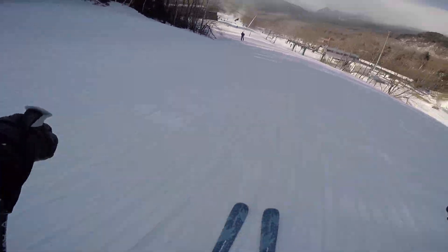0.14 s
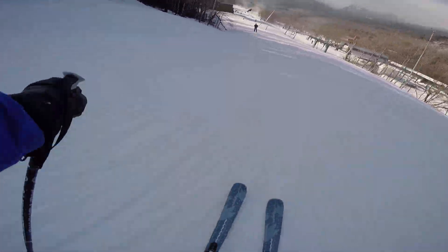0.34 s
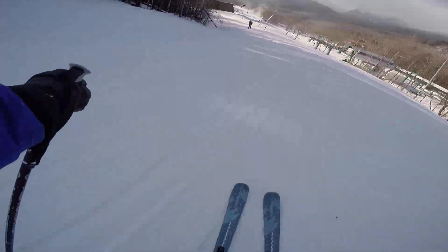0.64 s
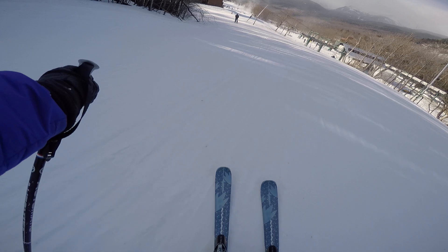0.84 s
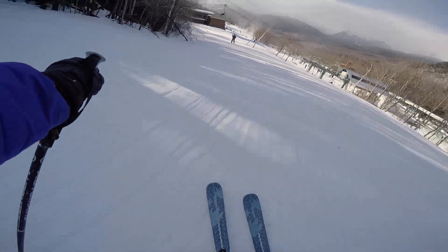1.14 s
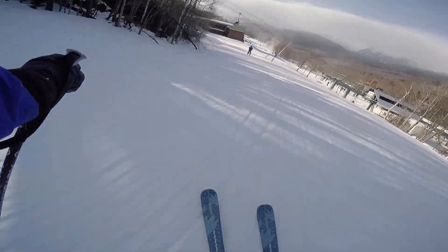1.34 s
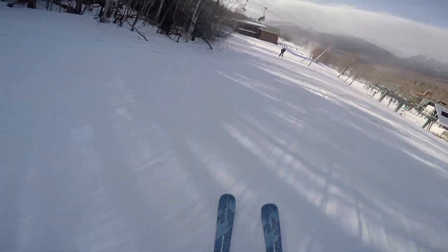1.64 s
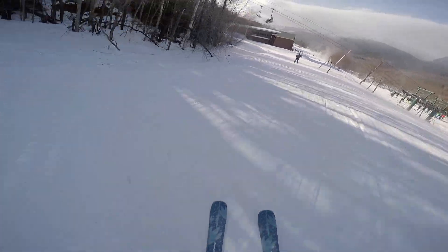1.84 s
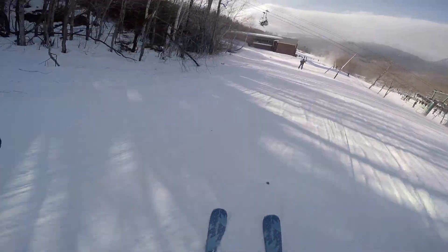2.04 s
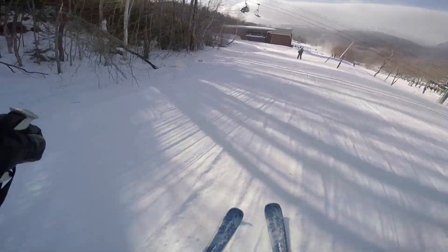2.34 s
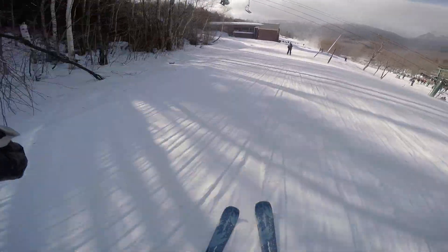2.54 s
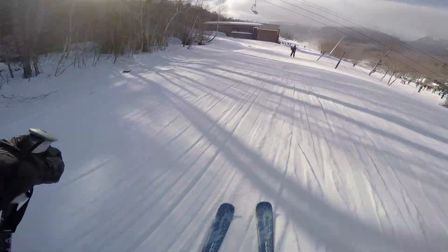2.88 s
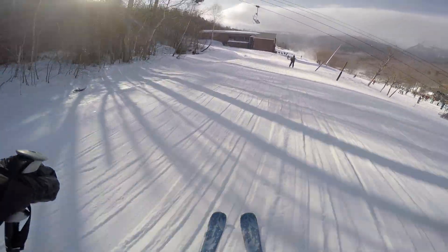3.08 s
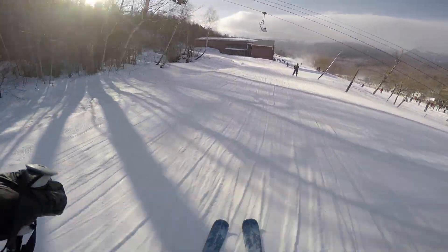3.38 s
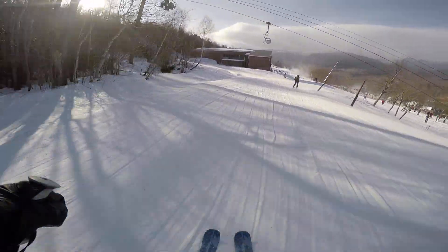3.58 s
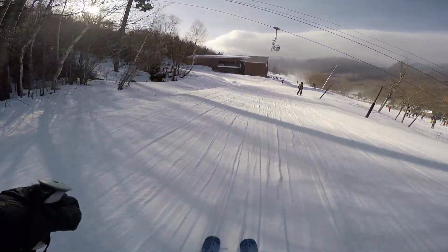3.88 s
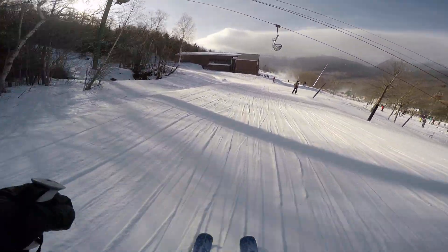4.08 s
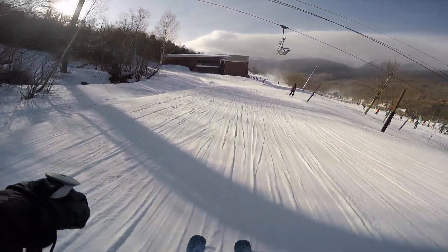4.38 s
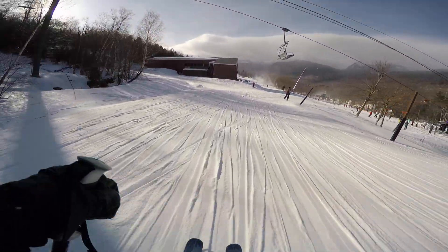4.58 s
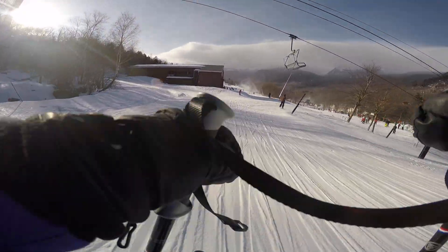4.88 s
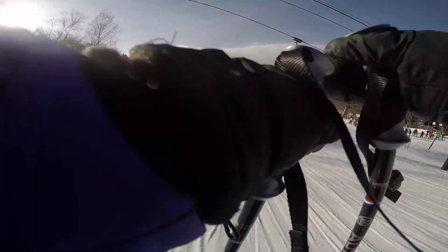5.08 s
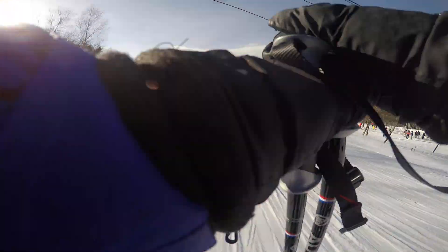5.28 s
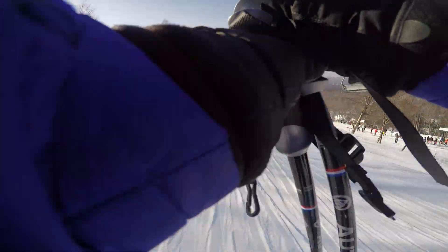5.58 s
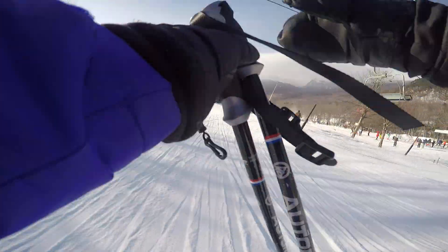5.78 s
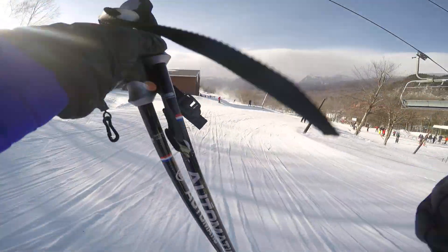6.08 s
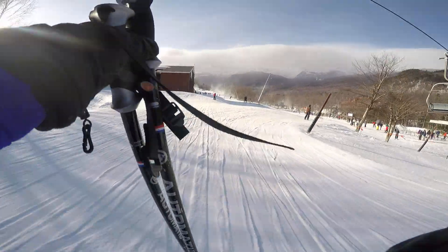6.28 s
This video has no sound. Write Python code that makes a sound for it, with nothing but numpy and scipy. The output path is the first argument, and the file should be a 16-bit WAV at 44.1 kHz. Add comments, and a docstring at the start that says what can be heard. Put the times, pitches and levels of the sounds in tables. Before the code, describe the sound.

Skis hiss and chatter over packed snow through a long turn, heard from a body-worn microphone whose plastic case rattles with the vibration. Wind rumbles and throbs on the microphone throughout. A buckle snaps right at the start, and small knocks and thumps follow the bumps. About halfway the skis run straight and grow quieter. Near the end the poles clack together once, then a gust rushes up.

```python
"""Skis hiss and chatter on packed, groomed snow through a long turn, then run straight and quieter.
Snow crystals break under them, and their shaking keeps the plastic case of a body-worn camera ringing.
Wind buffets the microphone. A buckle snaps near the start, the poles clack together late in the run,
and at the end a gust rushes over the case. Mono."""
import sys
import numpy as np
from scipy import signal
from scipy.fft import rfft, irfft
from scipy.io import wavfile
from scipy.ndimage import uniform_filter1d

SR = 44100
rng = np.random.default_rng(int(sys.argv[2]) if len(sys.argv) > 2 else 0)


def persist_wave(psi):
    """Save psi, clipped to +-1, as 16-bit WAV."""
    counts = np.round(np.clip(psi, -1, 1) * 32767).astype(np.int16)
    wavfile.write(sys.argv[1], SR, np.atleast_2d(counts).T)


N = 283108
TIME = np.arange(N) / SR
FIRM_DB, BREEZE_DB = -45, -40  # reference levels of scrape and turbulence for the layers that follow them
BUFFET_S = 0.06  # half-width of a buffet

# how hard the skis scrape, strong in the turn and light on the straight: t/s, level/dB
SCRAPE = [(0, -46.5), (.1, -50.5), (.19, -45.5), (.39, -47), (.55, -46), (1.27, -42.5), (1.75, -47),
          (2.0, -44.5), (2.23, -45.5), (2.45, -49), (3.1, -50.5), (3.6, -53), (4.06, -52), (4.3, -55.5),
          (4.8, -53.5), (5.45, -55.5), (5.85, -55), (6.22, -57)]
# resonances of the plastic case: f/Hz, width/Hz, level/dB
CASE_MODES = [(1853, 114.5, 1.5), (2256, 79, -7.5), (2690, 72, -15.5), (2848, 75, -8), (3520, 105, -16.5),
              (4260, 160, -17.5), (6190, 42, -21), (7240, 280, -24)]
# single large eddies: t/s, throb level/dB, f/Hz, turbulence lift/dB
BIG_EDDIES = [(.54, -29, 36, -1), (.7, -23.5, 28, 2.5), (1.12, -31, 38, 4.5), (1.5, -30, 36, -2),
              (2.09, -29, 64, 1), (2.21, -28, 52, 3), (2.42, -29, 56, 2.5), (2.68, -31, 60, 3),
              (5.11, -35, 36, 0.5), (6.25, -33.5, 55, 0.5)]
# tone colour of rushing air and rubbing cloth: f/Hz, level/dB
RUSH_EQ = [(300, -1.5), (580, -9), (710, 0), (850, 1.5), (1130, -2), (1280, 1), (1900, -1.5), (2700, 1),
           (3500, -2), (4200, -10.5), (7000, -22), (7800, -40), (15000, -38)]


def skis(rough_db=0.84, rattle_db=1.5, judder_db=4, sway_db=1.05):
    """Snow crystals break under the skis; ridges roughen the hiss, shake the case and drum in the body."""
    # tone colour of the hiss: f/Hz, level/dB
    hiss_eq = [(500, -31), (1400, -26), (1750, -3.5), (2250, 4.5), (2500, 5), (2750, 3), (3600, 4),
               (4000, 3), (4350, 2.5), (4800, 1.5), (5350, -1), (6000, 1.5), (7600, -3), (8600, -13),
               (10000, -27)]
    # tone colour of the fine spray: f/Hz, level/dB
    spray_eq = [(6000, -34), (7800, -5.5), (8700, -7), (9400, -1), (10000, 1.5), (10500, -1), (11200, 0),
                (12100, -3.5), (13150, -2), (14000, -5.5), (15300, -6)]
    # tone colour of the drumming carried up through the body: f/Hz, level/dB
    drum_eq = [(120, -34), (220, -5.5), (280, -1.5), (350, 2), (400, -4.5), (450, -13.5), (540, -18.5),
               (1200, -58)]
    # envelope of that drumming: t/s, level/dB
    drum_curve = [(0, -57.5), (.38, -53.5), (.5, -42.5), (.8, -48), (1.3, -48.5), (1.45, -45.5),
                  (1.85, -46.5), (2.35, -41), (3.1, -53.5), (3.7, -57), (4.45, -63.5), (5.05, -56),
                  (6.1, -59.5), (6.42, -46)]
    # rolls in the snow shake the case harder when the skis press in, less over a crest: t/s, lift/dB
    rolls = [(.3, 2), (.39, -3.5), (.52, 2), (.67, 4), (1.28, 4), (1.58, 1), (2.22, 2), (2.54, 4.5),
             (2.83, 2), (2.96, -2.5), (3.06, 4), (3.39, 2.5), (3.5, -5), (3.62, -5), (3.74, 3.5),
             (4.04, 3.5), (4.34, 4.5), (4.74, 2.5), (4.85, -5), (5.0, 5), (5.18, 5), (5.65, 0.5)]
    scrape_db = follow(SCRAPE)[0] + 0.5 * wander(27)
    roll_db, = swells(rolls, width_s=0.038)
    hiss_db = scrape_db + 0.094 * roll_db + 4
    spray_db = -49.5 + 0.89 * (scrape_db - FIRM_DB)
    shake_db = -37 + 1.005 * (scrape_db - FIRM_DB) + roll_db + sway_db * wander(18)
    ridges = wander(70)
    crystals = noise() + 0.45 * grains(per_s=2500, spread_db=3)
    crunch = crystals * amp(rough_db * ridges)
    hiss = colour(crunch, hiss_eq) * amp(hiss_db)
    spray = colour(crunch, spray_eq) * amp(spray_db)
    shaking = noise() + 0.49 * grains(per_s=500, spread_db=2)
    shaking *= amp(rattle_db * unit(ridges + wander(50)))
    rattle = steady(resonate(shaking, CASE_MODES), 0.047) * amp(shake_db)
    judder = colour(noise() * amp(judder_db * wander(59)), drum_eq)
    drum = steady(judder, 0.12) * amp(follow(drum_curve)[0] - 1.5)
    return hiss + spray + rattle + drum


def chatter(rise=0.44, width=0.27, attack_share=0.59):
    """Each catch of an edge is a tiny scrape that rises in pitch as the edge slips free."""
    # edges catching on ridges of snow: t/s, level/dB, centre f/Hz, length/s
    catches = [(.302, -35.5, 3300, .018), (0.548, -30, 2700, 0.0047), (.593, -34, 2900, 0.009),
               (.609, -30, 2880, .004), (.677, -33, 2500, .005), (.712, -34, 2980, .005),
               (.819, -36, 3000, .005), (0.847, -31, 2440, .005), (.979, -32, 2910, .006),
               (1.032, -35.5, 3400, 0.0074), (2.176, -35, 3000, .005), (2.212, -30, 2690, .007),
               (2.257, -30, 3010, .007), (2.364, -32, 3000, .006), (2.400, -30, 2880, .006),
               (2.428, -29.5, 4100, .004), (2.451, -31, 3300, .004), (2.473, -33.5, 3290, .006),
               (2.515, -38, 2730, .005), (2.565, -34, 2600, 0.0049), (2.597, -34, 2510, .008),
               (2.649, -38, 2600, .006), (2.683, -31.5, 2590, 0.00615), (2.753, -35.5, 3000, .005),
               (2.787, -36, 3270, .005), (2.961, -34, 3600, .004), (3.038, -34.5, 3300, .005),
               (4.062, -35.5, 2700, .005), (5.927, -40.5, 2490, 0.016)]
    out, f = np.zeros(N), np.fft.fftfreq(2048, 1 / SR)
    t = (np.arange(len(f)) - len(f) / 2) / SR
    for s, db, hz, length in catches:
        spectrum = noise(len(f)) + 1j * noise(len(f))
        band = np.fft.ifft(spectrum * np.exp(-(f / (width * hz)) ** 2 / 2))
        cycles = np.cumsum(hz * (1 + rise * np.tanh(t / length))) / SR
        envelope = np.exp(-(2 * t / (length * np.where(t < 0, attack_share, 1))) ** 2)
        slip = (band * np.exp(2j * np.pi * cycles)).real * envelope
        add(out, s + t[0], amp(db) * slip * np.linalg.norm(envelope) / np.linalg.norm(slip))
    return signal.sosfilt(signal.butter(4, 1600, "high", fs=SR, output="sos"), out)


def wind(lump_db=2, flutter_db=2.1):
    """Slow pressure lumps rumble, finer eddies ride on them, and air brushes over the clothes."""
    # air on the microphone: t/s, rumble level/dB, turbulence level/dB
    airflow = [(0, -37.5, -49.5), (.36, -36.5, -43.5), (.55, -30.5, -39), (.9, -32.5, -42),
               (1.3, -37, -42.5), (1.55, -36, -36), (1.85, -36, -40.5), (2.1, -32.5, -32),
               (2.5, -31.5, -40.5), (2.95, -32.5, -40.5), (3.08, -35, -45.5), (3.65, -39, -48.5),
               (4.45, -42, -52), (4.8, -42.5, -46.5), (5.15, -38, -40.5), (5.5, -44, -46),
               (6.05, -36, -43.5), (6.42, -29, -30)]
    # tone colour of the rumble: f/Hz, level/dB
    rumble_eq = [(8, -12), (18, -5.5), (28, 2.5), (42, -2), (54, -2), (64, -7.5), (85, -22), (200, -57)]
    # tone colour of the eddies: f/Hz, level/dB
    eddy_eq = [(35, -22), (54, -5), (68, -0.5), (85, -6), (105, -10), (140, -13.5), (200, -14.5),
               (280, -26), (400, -27.5), (1500, -69)]
    # tone colour of air on cloth: f/Hz, level/dB
    cloth_eq = [(300, -13), (560, -3), (700, 5), (800, 0.5), (930, -3), (1270, 1), (1450, -5), (2500, -1),
                (5000, -22.5)]
    rumble_db, eddy_db = follow(airflow)
    stir_db, = swells([(s, lift_db) for s, _, _, lift_db in BIG_EDDIES], BUFFET_S)
    rumble = steady(colour(noise(), rumble_eq), 0.045) * amp(rumble_db - 1)
    turbulence = colour(noise() * amp(lump_db * wander(37)), eddy_eq)
    eddies = steady(turbulence, 0.089) * amp(eddy_db + stir_db)
    brush_db = -50 + 0.58 * (eddy_db - BREEZE_DB) + 0.24 * (follow(SCRAPE)[0] - FIRM_DB)
    cloth = colour(noise() * amp(flutter_db * wander(60)), cloth_eq) * amp(brush_db)
    return rumble + eddies + cloth


def buffets(width_hz=9.1):
    """Each large eddy presses on the microphone with a few slow, uneven throbs."""
    out = np.zeros(N)
    throb = steady(wander(width_hz), 0.21) + 1j * steady(wander(width_hz), 0.2)
    for s, db, hz, _ in BIG_EDDIES:
        envelope = np.exp(-((TIME - s) / BUFFET_S) ** 2 / 2)
        out += amp(db) * envelope * (throb * np.exp(2j * np.pi * hz * TIME)).real
    return out


def gust(sing_db=-35, steepness=2.2):
    """Air rushes over the case; its gaps sing only when the flow is strongest."""
    # the gust builds: t/s, level/dB
    build = [(5.6, -59), (5.87, -55), (6.2, -49.5), (6.24, -46.5), (6.31, -44), (6.34, -36.5),
             (6.37, -35.5), (6.42, -35.5)]
    # resonances of the gaps in the case: f/Hz, width/Hz, level/dB
    gaps = [(755, 33, 4.5), (1130, 45, 5), (1930, 160, 3), (3480, 59, -4), (5140, 80, -4), (5650, 310, -10),
            (6400, 130, -14), (6900, 70, -9.5)]
    level_db, = follow(build)
    rush = colour(noise() * amp(2.8 * wander(80)), RUSH_EQ) * amp(level_db - 1.5)
    singing = resonate(noise(), gaps) * amp(sing_db + steepness * (level_db - level_db.max()))
    return rush + singing


def gear():
    """Poles, buckle and strap knock about near the camera, and each struck part rings in its own modes."""
    # modes of the ski poles: f/Hz, level/dB, t60/s
    pole_modes = [(1606, -9, 0.053), (1810, 0.5, 0.038), (2040, -5.5, 0.041), (2280, -7, 0.017),
                  (2536, -.5, 0.052), (2840, -10.5, 0.045), (2990, -9.5, 0.032), (3140, -21, .03),
                  (3535, -5.5, 0.048), (3975, 0.5, 0.02), (4140, -4.5, 0.042), (4340, -13, .015),
                  (5050, -13, 0.016), (5640, -11.5, 0.012), (8350, -39, 0.16), (8635, -29, 0.12),
                  (8845, -30, .08), (9650, -20, 0.042), (10345, -21, .035), (10540, -14, 0.033),
                  (11800, -31, .02), (12800, -20, .025)]
    # the poles clack together: t/s, level/dB, treble tilt/(dB per octave)
    clacks = [(5.373, -18, 2.5), (5.3786, -18, 3.5), (5.3800, -17, -2.5)]
    # modes of the plastic buckle: f/Hz, level/dB, t60/s
    buckle_modes = [(1572, -9, 0.058), (1996, 1.5, 0.026), (2410, 2.5, 0.019), (2800, -1, 0.024),
                    (3430, -0.5, 0.043), (4070, -14, .018), (4750, -10, 0.022), (5560, 0, 0.016),
                    (7170, -9, 0.016), (7750, -12, .014)]
    # the buckle snaps against a pole: t/s, level/dB, treble tilt/(dB per octave)
    snaps = [(.1213, -19.5, -0.5)]
    # modes of the camera mount: f/Hz, level/dB, t60/s
    mount_modes = [(700, -10, 0.031), (1007, -10, 0.014), (1280, -1, 0.014), (2007, 4.5, .018),
                   (2440, -4, 0.028), (3250, -12, .01), (5300, -11, 0.014)]
    # dull taps of the strap on the mount: t/s, level/dB, treble tilt/(dB per octave)
    taps = [(1.534, -33, -1), (2.398, -30, -3), (2.649, -41, -6.5), (3.1158, -35, -3), (3.1407, -30, 6),
            (3.1418, -25.5, -1), (5.3304, -29, 3), (6.223, -42, -8)]
    poles = struck(pole_modes, clacks, crack_db=-0.5, crack_s=0.0045)
    buckle = struck(buckle_modes, snaps, crack_db=3, crack_s=0.0014)
    strap = struck(mount_modes, taps, crack_db=-9, crack_s=0.0015)
    return poles + buckle + strap


def struck(modes, blows, crack_db, crack_s, attack_s=0.00033):
    """Each blow feeds energy into an object's modes and gives a brief crack; its tilt sets the brightness."""
    # tone colour of the crack at contact: f/Hz, level/dB
    crack_eq = [(900, -67), (1400, -12), (1750, 9.5), (4200, 8), (5500, -7.5), (7800, -20), (8700, -6),
                (13000, -6.5), (15500, -14)]
    out, t = np.zeros(N), np.arange(SR // 6) / SR
    attack = 1 - np.exp(-t / attack_s)
    for hz, mode_db, t60 in modes:
        energy = np.zeros(N)
        for s, db, tilt_db in blows:
            ring_db = db + mode_db + tilt_db * np.log2(hz / 2500) - 60 * t / t60
            add(energy, s, (attack * amp(ring_db)) ** 2)
        out += np.sqrt(energy) * np.sin(2 * np.pi * (hz * TIME + rng.random()))
    for s, db, tilt_db in blows:
        crack = colour(noise(len(t)), crack_eq) * attack * np.exp(-t / crack_s)
        add(out, s, amp(db + crack_db + tilt_db) * crack)
    # a small object radiates little below its lowest mode
    return signal.sosfilt(signal.butter(8, 0.95 * modes[0][0], "high", fs=SR, output="sos"), out)


def jolts(attack_s=0.00084, ring_s=0.0079, thump_s=0.003):
    """Bumps ring the lowest resonance of the case; ruts and eddies give a short, dull push."""
    # bumps that jolt the case: t/s, level/dB
    bumps = [(1.257, -23.5), (1.582, -22), (2.198, -27), (4.328, -28.5)]
    # pushes on the microphone: t/s, level/dB, f/Hz
    thumps = [(1.042, -26, 172), (1.417, -30, 353), (1.477, -30, 193), (1.597, -30.5, 318),
              (1.726, -29.5, 331), (2.094, -27, 253), (2.328, -29.5, 236), (2.860, -29, 186),
              (2.9, -30.5, 159), (3.349, -39, 340), (6.223, -29, 150), (6.246, -22, 70),
              (6.365, -17.5, 113), (6.378, -12.5, 75)]
    out, t = np.zeros(N), np.arange(SR // 10) / SR
    ping = np.sin(2 * np.pi * CASE_MODES[0][0] * t) * np.exp(-t / ring_s) * (1 - np.exp(-t / attack_s))
    push = t / thump_s * np.exp(1 - t / thump_s)
    for s, db in bumps:
        add(out, s, amp(db) * ping)
    for s, db, hz in thumps:
        add(out, s, amp(db) * np.sin(2 * np.pi * hz * t) * push)
    return out


def scuffs(grain_db=4, attack_s=0.003, release_s=0.016):
    """Cloth rubs briefly: a crisp start, a grainy stroke and a quick fade."""
    # sleeve and glove strokes near the camera: t/s, level/dB, hold/s, treble tilt/(dB per octave)
    strokes = [(.257, -44.5, 0.041, -3.5), (2.397, -39, 0.0052, -5), (5.85, -50, 0.095, 3),
               (6.222, -37.5, 0.011, -3.5)]
    out, t = np.zeros(N), np.arange(SR // 4) / SR
    grain = amp(grain_db * wander(120))[:len(t)]
    for s, db, hold_s, tilt_db in strokes:
        rub_eq = [(hz, level + tilt_db * np.log2(hz)) for hz, level in RUSH_EQ]
        envelope = (1 - np.exp(-t / attack_s)) * np.exp(-np.maximum(t - hold_s, 0) / release_s)
        add(out, s, amp(db) * colour(noise(len(t)) * grain, rub_eq) * envelope)
    return out


def amp(db):
    """Decibels to gain."""
    return 10 ** (np.asarray(db) / 20)


def unit(x):
    """Scales to rms 1."""
    return x / np.sqrt(np.mean(x ** 2) + 1e-20)


def follow(rows):
    """One envelope for each level column of a timed table."""
    s, *columns = np.transpose(rows)
    return [np.interp(TIME, s, c) for c in columns]


def swells(rows, width_s):
    """A bell-shaped swell or dip in dB around each event, one curve for each level column."""
    s, *columns = np.transpose(rows)
    return np.array(columns) @ np.exp(-((TIME - s[:, None]) / width_s) ** 2)


def add(mix, s, sound):
    """Mixes a sound in at s seconds."""
    part = mix[max(round(s * SR), 0):][:len(sound)]
    part += sound[:len(part)]


def noise(size=N):
    """White noise."""
    return rng.standard_normal(size)


def wander(hz):
    """Smooth random modulation up to about hz, at rms 1."""
    f = np.fft.rfftfreq(N, 1 / SR)
    return unit(irfft(rfft(noise()) * np.exp(-(f / hz) ** 2), N))


def grains(per_s, spread_db):
    """Sparse clicks of uneven size, at rms 1."""
    size = amp(spread_db * np.minimum(rng.exponential(1, N), 4))
    return unit(noise() * size * (rng.random(N) < per_s / SR))


def colour(x, eq):
    """Shapes x with an EQ curve, at rms 1."""
    hz, db = np.transpose(eq)
    f = np.fft.rfftfreq(len(x), 1 / SR)
    gain = amp(np.interp(np.log(f + 1), np.log(hz), db))
    return unit(irfft(rfft(x) * gain, len(x)))


def resonate(x, peaks):
    """Rings x through a set of resonances, at rms 1."""
    f = abs(np.fft.fftfreq(N, 1 / SR))
    gain = sum(amp(db) / (1 + ((f - hz) / width) ** 2) for hz, width, db in peaks)
    causal = np.exp(signal.hilbert(np.log(gain)).conj())  # the ringing follows its cause
    return unit(irfft(rfft(x) * causal[:N // 2 + 1], N))


def steady(x, seconds):
    """Levels out swells slower than the given time."""
    size = max(int(seconds * SR), 2)
    power = uniform_filter1d(uniform_filter1d(x ** 2, size), size)
    return x / np.sqrt(abs(power) + 1e-12)


def scene():
    """All sources reach one microphone, the same in both channels."""
    mono = skis() + chatter() + jolts() + wind() + gust() + scuffs() + gear() + buffets()
    return np.array([mono, mono])


def record(dry):
    """The camera cuts off the top of the treble."""
    lowpass = signal.firwin(511, cutoff=15330, window=("kaiser", 9), fs=SR)
    return signal.oaconvolve(dry, lowpass[None], "same")


dry = scene()
out = record(dry)
persist_wave(out)
```